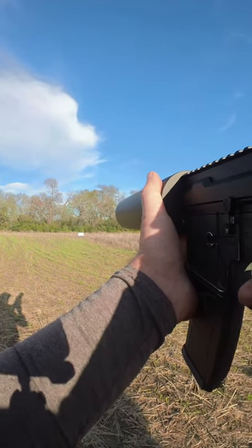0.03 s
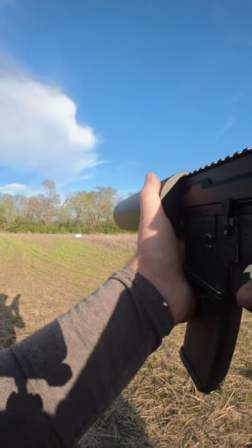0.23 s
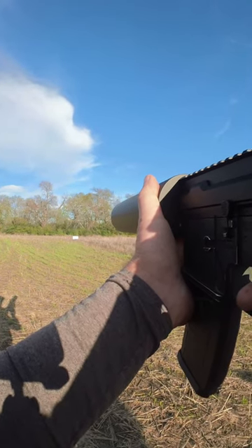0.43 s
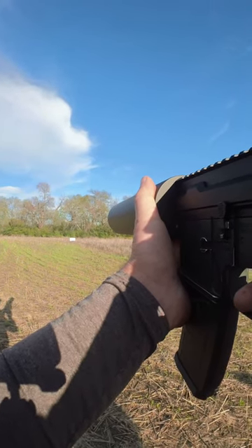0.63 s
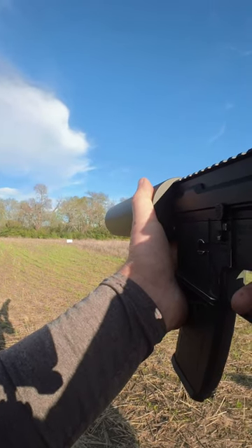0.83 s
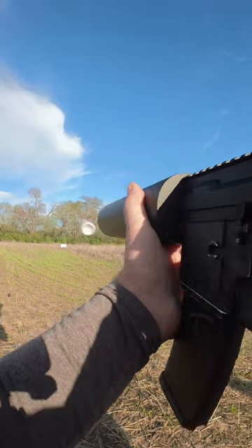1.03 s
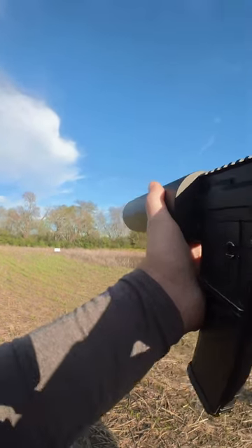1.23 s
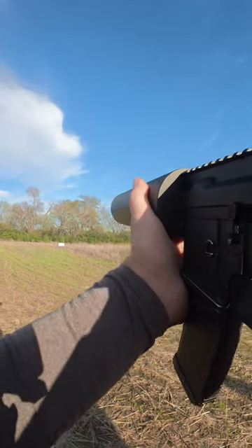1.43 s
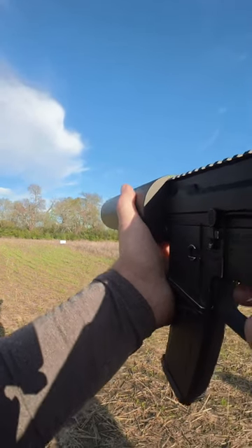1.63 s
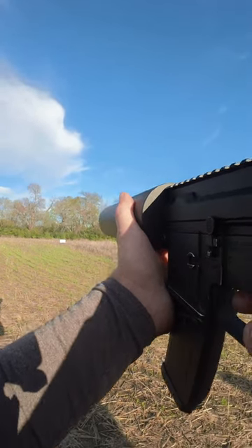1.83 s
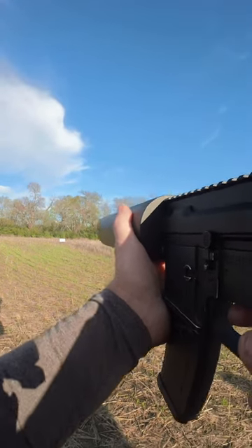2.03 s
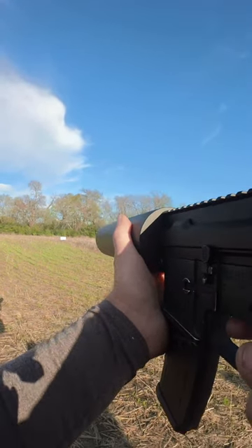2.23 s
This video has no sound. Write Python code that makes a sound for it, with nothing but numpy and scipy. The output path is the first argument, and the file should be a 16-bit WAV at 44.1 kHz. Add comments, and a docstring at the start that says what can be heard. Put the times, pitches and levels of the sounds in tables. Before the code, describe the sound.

Low gusty wind buffets a close microphone outdoors, then one abrupt launcher shot bangs with a hollow tube-like thump. The level drops sharply, and a soft tree-line echo and thin high metal tone rise as it recovers.

```python
"""A launcher is fired once in an open field, close to a microphone buffeted by wind.
The striker, charge and muzzle blast are noise bursts; the tube and metal ring as decaying sines.
The ground and the tree line answer with decaying scatter; wind is noise plus rounded pressure swings.
A gain control drops far at the shot; as it recovers, echo, wind and a high metal ring swell back in."""
import sys
import numpy as np
from scipy import signal
from scipy.fft import rfft, irfft
from scipy.io import wavfile
from scipy.ndimage import uniform_filter1d, minimum_filter1d

SR = 44100
rng = np.random.default_rng(int(sys.argv[2]) if len(sys.argv) > 2 else 0)


def inscribe(sig):
    """Save sig as 16-bit PCM at rate SR to the path in sys.argv[1].

    A 1-D sig is mono; a 2-D sig holds one channel per row.
    Samples are clipped to [-1, 1] before scaling.
    """
    pcm = np.round(np.clip(np.atleast_2d(sig).T, -1, 1) * 32767)
    wavfile.write(sys.argv[1], SR, pcm.astype(np.int16))


N = 100812
TIME = np.arange(N) / SR  # s

# All source levels are those ahead of the gain control; spectra set the colour only.
# Wind strength: (time [s], level [dB])
WIND_LEVEL = [(0, -21), (.08, -23.5), (.25, -22), (.33, -15), (.5, -16.5), (.58, -13), (.64, -23.5),
              (.68, -16.5), (.86, -17), (.96, -22), (1.1, -9.5), (1.3, -16.5), (1.46, -8), (1.54, -23),
              (1.8, -24), (1.96, -27), (2.05, -19.5), (2.15, -33.5), (2.28, -20.5)]
# Spectrum of the wind's low rumble: (frequency [Hz], density [dB per Hz])
RUMBLE_SPECTRUM = [(12, -16.5), (25, 3.5), (50, -1.5), (95, 3.5), (160, -4), (260, -14.5), (450, -33.5),
                   (900, -47), (2000, -86)]
# Spectrum of the wind's airy hiss: (frequency [Hz], density [dB per Hz])
HISS_SPECTRUM = [(200, -10.5), (900, 5.5), (1600, -5), (2200, -15), (3000, -32.5), (4000, -23),
                 (5500, -32.5), (7300, -25), (9500, -42), (11500, -33.5), (16000, -41.5)]
# Large eddies that hit the microphone: (time [s], peak level [dB], width [s])
LARGE_EDDIES = [(0.015, -3, 0.0014), (0.025, -2, 0.0014), (0.147, -8.5, 0.00115), (0.311, -6, 0.0011),
                (0.318, -8.5, 0.00069), (0.441, -3.5, 0.00143), (0.458, -1.5, 0.0011), (0.465, -15, 0.002),
                (0.478, -1, 0.0016), (0.49, -3, 0.00097), (0.499, 2, 0.00096), (0.557, -8, 0.0013),
                (0.607, -7.5, 0.00067), (0.675, -5.5, 0.00083), (0.714, -4.5, 0.00103), (0.724, -1, 0.0011),
                (0.753, -10.5, 0.0013), (0.773, -6, 0.0011), (0.781, -3, 0.00078), (0.79, -2.5, 0.00088),
                (0.805, -5, 0.0014), (0.836, -4, 0.0015), (1.054, -3.5, 0.0014), (1.078, -11.5, 0.00081),
                (1.121, 13, 0.0014), (1.442, -2, 0.00078), (1.654, -16.5, 0.0011), (1.686, -14.5, 0.00109),
                (1.71, -25, 0.00109), (1.849, -11, 0.0015), (1.919, -10.5, 0.0016), (2.21, -9.5, 0.0014),
                (2.27, -12.5, 0.0014)]

# Stages of the firing: (time [s], level [dB], hold [s], 60 dB decay time [s]),
# each with its spectrum: (frequency [Hz], density [dB per Hz])
STRIKER = (1.1348, 22.2, 0.0013, 0.008)
STRIKER_SPECTRUM = [(300, -32), (900, -14.5), (2300, -3.5), (5000, -1.5), (6500, -19), (8600, -21.5),
                    (12000, -16.5), (16000, -31)]
CRACK = (1.1458, 28.8, .002, .016)
CRACK_SPECTRUM = [(100, -29), (300, -26.5), (900, -1), (1950, 2), (2600, -16), (3800, -11.5), (4900, -10.5),
                  (7500, -22), (13500, -26.5), (16000, -43)]
BLAST = (1.1514, 32.1, .006, .03)
BLAST_SPECTRUM = [(60, -38.5), (200, -8), (350, 6.5), (530, -1.5), (720, -18), (950, -8.5), (1400, -24.5),
                  (2000, -8.5), (3600, -26), (5000, -25.5), (8500, -33.5), (13500, -39.5), (16000, -46)]
# Resonances of the tube's air column and the metal:
# (frequency [Hz], initial rms level [dB], 60 dB decay time [s])
RESONANCES = [(349.5, 22.5, .26), (527, 6.5, .12), (1561.3, -17, 2.3), (1865, 22, 0.055), (2280, -19.5, .8),
              (4807, -37.5, .9)]
# Knocks of the mechanism: (time [s], level [dB], hold [s], 60 dB decay time [s])
KNOCKS = [(1.1583, 33, 0.0011, 0.013), (1.191, 9, 0.0047, .04), (1.963, -33, .002, 0.021),
          (1.970, -37.5, .003, .03), (2.072, -56.5, .02, .12)]
# Spectrum shared by the knocks: (frequency [Hz], density [dB per Hz])
KNOCK_SPECTRUM = [(300, 10), (1100, 6.5), (2400, -1), (3800, -10.5), (4900, -8), (7500, -20), (10000, -37),
                  (15000, -40)]

# Scatter from the ground: (time [s], level [dB], rise [s])
GROUND = (1.158, 15.8, .002)
# its spectrum: (frequency [Hz], density [dB per Hz])
GROUND_SPECTRUM = [(40, 4.5), (150, 7), (400, 9.5), (900, 4), (2200, 2), (3500, -9), (5500, -7),
                   (8000, -18), (13000, -28.5), (16000, -25.5)]
# its decay: (frequency [Hz], 60 dB decay time [s])
GROUND_DECAY = [(100, 0.43), (700, 0.23), (2000, .26), (5000, 0.32), (8000, .3), (14000, 0.19)]
# Scatter from the tree line: (time [s], level [dB], rise [s])
TREES = (1.385, -26, 0.027)
# its spectrum: (frequency [Hz], density [dB per Hz])
TREES_SPECTRUM = [(100, 10), (400, 2), (800, -4), (1300, 4), (2500, 3), (3500, -7), (5300, -12),
                  (7500, -29), (11000, -57.5), (15000, -59.5)]
# its decay: (frequency [Hz], 60 dB decay time [s])
TREES_DECAY = [(200, 1.6), (1000, 1.49), (2500, 1.215), (5000, 0.93), (10000, 0.68)]


def amp(db):
    """Definition of level: decibels to amplitude ratio."""
    return 10 ** (np.asarray(db) / 20)


def unit(x):
    """Normalization of power: scales to rms 1."""
    return x / np.sqrt(np.mean(x ** 2) + 1e-30)


def read(points, hz):
    """Logarithmic frequency scale: interpolates a table along it."""
    frequency, value = np.transpose(points)
    return np.interp(np.log(hz + 1), np.log(frequency + 1), value)


def add(mix, start_s, sound):
    """Superposition: adds a sound to the mix at a given time."""
    part = mix[round(start_s * SR):][:len(sound)]
    part += sound[:len(part)]


def noise(spectrum):
    """Spectral shaping: white noise weighted to a steady colour, at rms 1."""
    hz = np.fft.rfftfreq(N, 1 / SR)
    return unit(irfft(rfft(rng.standard_normal(N)) * amp(read(spectrum, hz)), N))


def rumble(level_db):
    """Turbulent pressure: low noise whose level follows the gusts."""
    x = noise(RUMBLE_SPECTRUM)
    x /= np.sqrt(uniform_filter1d(x ** 2, size=3500))  # evened out, so that the gusts set the level
    return amp(level_db + 1) * x


def hiss(level_db):
    """Aerodynamic noise: a faint airy hiss that follows part of the wind's swell."""
    mean_db, gust_share = -59, 0.4
    swell_db = gust_share * (level_db - level_db.mean())
    return amp(mean_db + swell_db) * noise(HISS_SPECTRUM)


def add_eddy(mix, center_s, db, width, phase, size=2048):
    """Time-bandwidth reciprocity: one rounded pressure swing, brighter when narrower."""
    t = np.arange(-size, size) / SR
    swing = (np.exp(2j * np.pi * phase) / (1 - 1j * t / width) ** 2).real  # phase in cycles
    swing *= np.hanning(2 * size)
    cut = max(size - round(center_s * SR), 0)  # samples that would fall before time zero
    add(mix, max(center_s - size / SR, 0), amp(db) * swing[cut:])


def large_eddies():
    """Vortex impact: isolated pressure swings thump on the microphone."""
    out = np.zeros(N)
    for eddy, phase in zip(LARGE_EDDIES, rng.random(len(LARGE_EDDIES))):
        add_eddy(out, *eddy, phase)
    return out


def small_eddies(level_db):
    """Poisson-like arrivals: a stream of small pressure swings follows the gusts."""
    rate, offset_db, spread_db = 150, -2, 2  # eddies per s, dB, dB
    typical_width, width_spread = 0.0013, 0.3  # s, natural-log units
    out = np.zeros(N)
    chance, phases = rng.random((2, N))
    strengths, widths = np.clip(rng.standard_normal((2, N)), -2, 2)
    for i in np.flatnonzero(chance < rate / SR):
        db = level_db[i] + offset_db + spread_db * strengths[i]
        width = typical_width * np.exp(width_spread * widths[i])
        add_eddy(out, i / SR, db, width, phases[i])
    return out


def wind():
    """Turbulence at many scales: rumble, hiss and small eddies share the gusts; large eddies thump."""
    level_db = np.interp(TIME, *np.transpose(WIND_LEVEL))
    return rumble(level_db) + hiss(level_db) + large_eddies() + small_eddies(level_db)


def causal(gain, size=8192):
    """Minimum phase: the most compact causal pulse with these magnitudes."""
    log_gain = np.log(np.maximum(gain, gain.max() * 1e-5))
    mirrored = np.r_[log_gain, log_gain[-2:0:-1]]
    response = np.exp(np.conj(signal.hilbert(mirrored)))
    return np.fft.ifft(response).real[:size]


def burst(level_db, hold, t60, spectrum, size=8192):
    """Transient turbulence: coloured noise starts at once, holds briefly and dies."""
    t, hz = np.arange(size) / SR, np.fft.rfftfreq(size, 1 / SR)
    envelope = amp(-60 * np.maximum(t - hold, 0) / t60)
    x = envelope * rng.standard_normal(size)
    for _ in range(3):  # flattens the noise, so that the spectrum table sets the colour
        white = irfft(np.exp(1j * np.angle(rfft(x))))
        x = white * np.sqrt(envelope)
    x = signal.fftconvolve(x, causal(amp(read(spectrum, hz))))[:size]
    # the energy is that of the envelope at the given level
    return amp(level_db) * x * np.linalg.norm(envelope) / np.linalg.norm(x)


def firing():
    """Impulsive release: the striker clicks, the charge cracks, then the muzzle blast thumps."""
    out = np.zeros(N)
    stages = [(STRIKER, STRIKER_SPECTRUM), (CRACK, CRACK_SPECTRUM), (BLAST, BLAST_SPECTRUM)]
    for (start_s, *shape), spectrum in stages:
        add(out, start_s, burst(*shape, spectrum))
    return out


def ringing():
    """Damped resonance: the air column and the metal ring on from the blast as decaying sines."""
    out = np.zeros(N)
    for hz, db, t60 in RESONANCES:
        peak = np.sqrt(2) * amp(db - 60 * TIME / t60)  # rms to peak
        add(out, BLAST[0], peak * np.sin(2 * np.pi * hz * TIME))
    return out


def knocks():
    """Impact excitation: the mechanism's knocks are short noise bursts of one colour."""
    out = np.zeros(N)
    for start_s, *shape in KNOCKS:
        add(out, start_s, burst(*shape, KNOCK_SPECTRUM))
    return out


def scatter(arrival, spectrum, decay, patchy_db, size=256):
    """Diffuse reflection: clumpy noise in which each frequency dies at its own rate."""
    start_s, level_db, rise = arrival
    hz, t, bands = signal.stft(noise(spectrum), SR, nperseg=size)
    clumps = unit(uniform_filter1d(rng.standard_normal(len(t)), size=5))
    gain_db = patchy_db * clumps - 60 * t / read(decay, hz)[:, None]
    tail = signal.istft(bands * amp(gain_db), SR, nperseg=size)[1][:N]
    out = np.zeros(N)
    add(out, start_s, amp(level_db) * np.minimum(TIME / rise, 1) * tail)
    return out


def scene():
    """Linear superposition: wind, launcher, and scatter from the ground and the tree line."""
    launcher = firing() + ringing() + knocks()
    ground = scatter(GROUND, GROUND_SPECTRUM, GROUND_DECAY, patchy_db=2.3)
    trees = scatter(TREES, TREES_SPECTRUM, TREES_DECAY, patchy_db=1.4)
    return (wind() + launcher + ground + trees)[None]


def record(dry):
    """Dynamic compression: look-ahead ducking with slow recovery, rounded peaks, a band limit."""
    threshold_db, recovery = -9, 102.5  # dB, dB per s
    lookahead, smoothing = 0.02, 0.011  # s
    power_db = 10 * np.log10(abs(uniform_filter1d(dry[0] ** 2, size=400)) + 1e-12)
    excess_db = np.maximum(power_db - threshold_db, 0)
    over_db = -minimum_filter1d(-excess_db, 2 * round(lookahead * SR) + 1)  # running maximum
    # reduction rises at once with the excess and falls no faster than the recovery
    fall_db = TIME * recovery
    held_db = np.maximum.accumulate(over_db + fall_db) - fall_db
    duck_db = uniform_filter1d(held_db, round(smoothing * SR))
    x = dry * amp(-duck_db)
    x = x / (1 + (x / 0.8) ** 8) ** (1 / 8)  # rounds peaks towards 0.8
    low_pass = signal.firwin(255, 16200, window=("kaiser", 9), fs=SR)  # edge in Hz
    return signal.oaconvolve(x, low_pass[None], "same")


dry = scene()
out = record(dry)
inscribe(out)
```